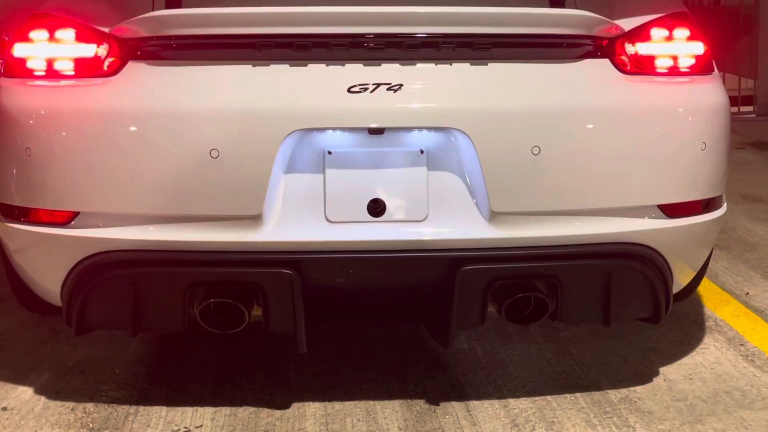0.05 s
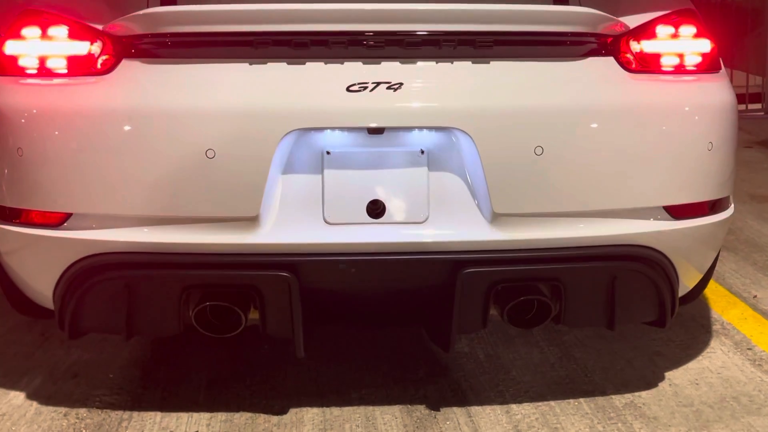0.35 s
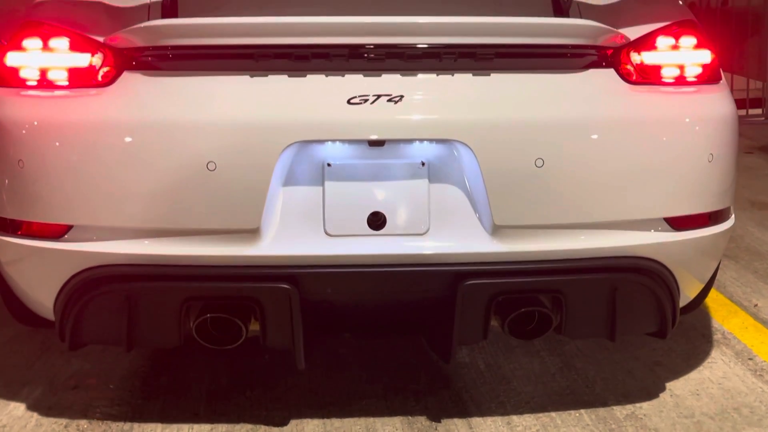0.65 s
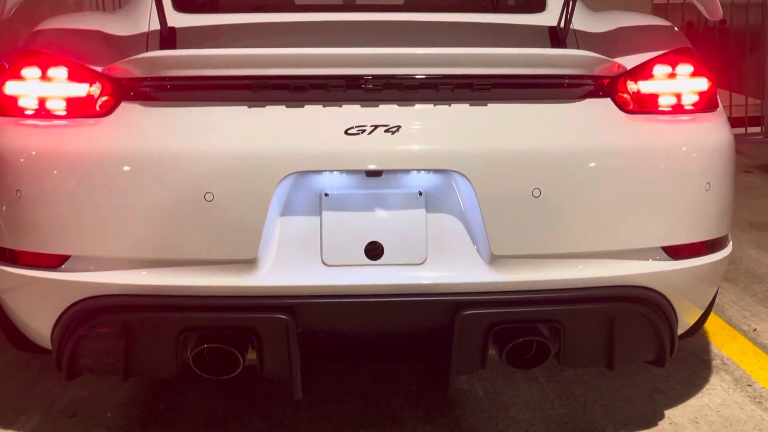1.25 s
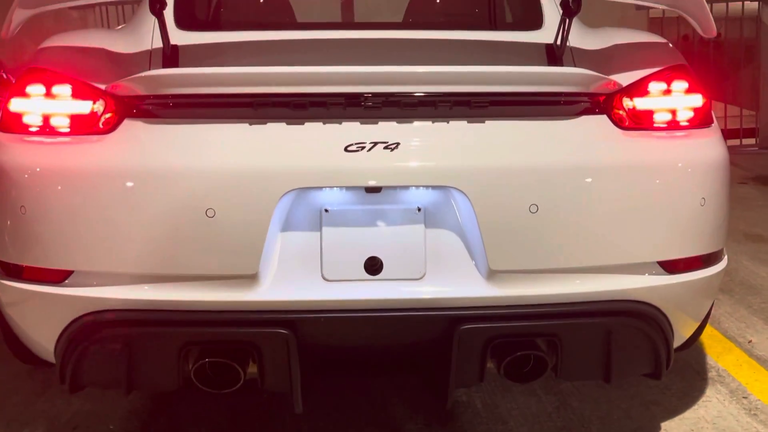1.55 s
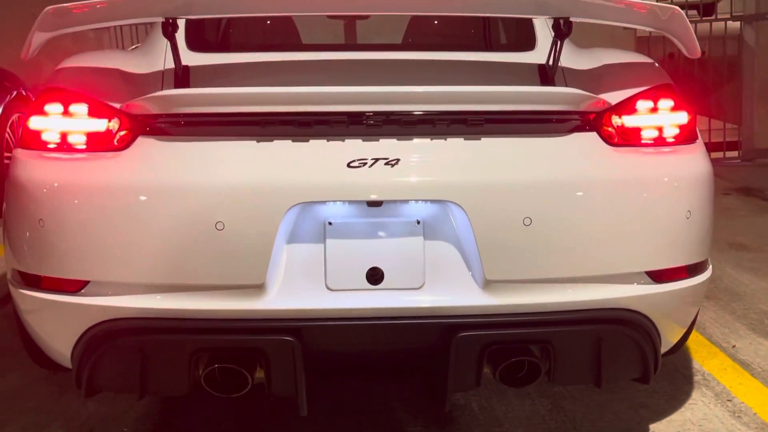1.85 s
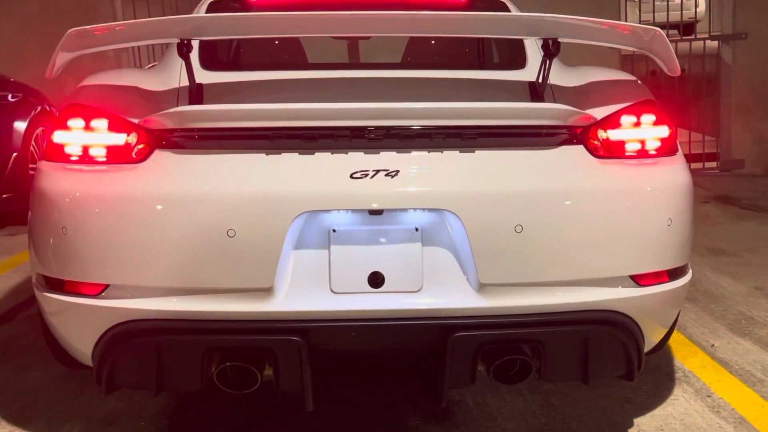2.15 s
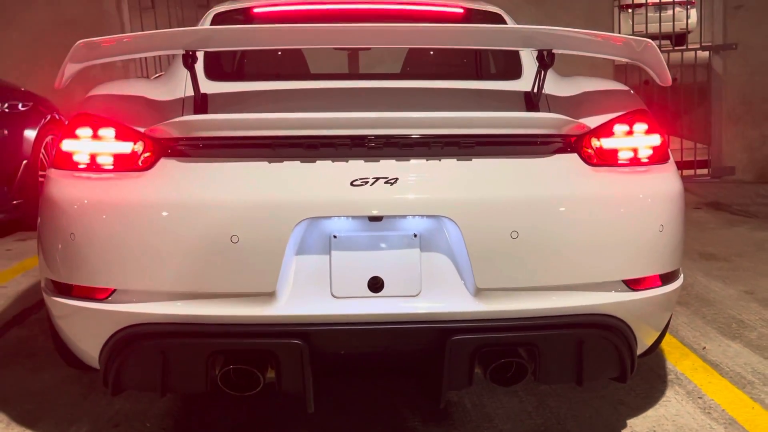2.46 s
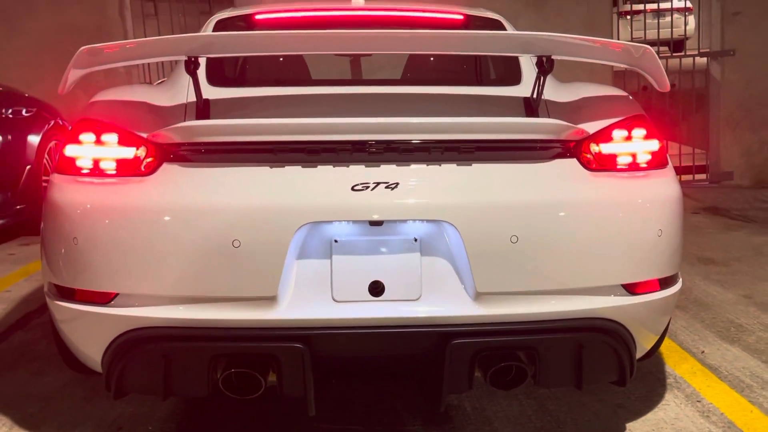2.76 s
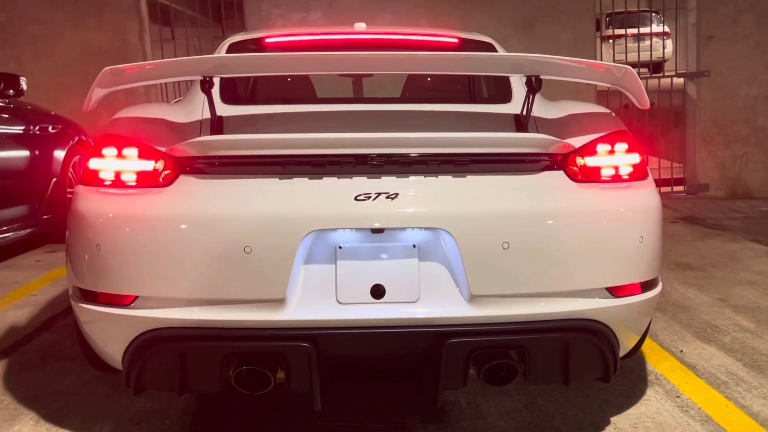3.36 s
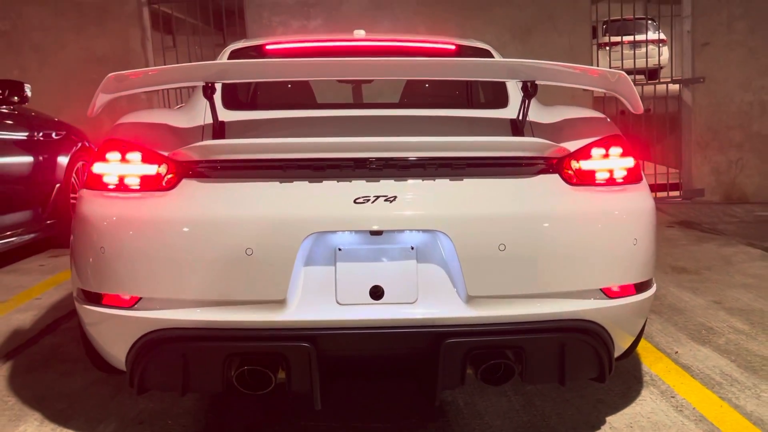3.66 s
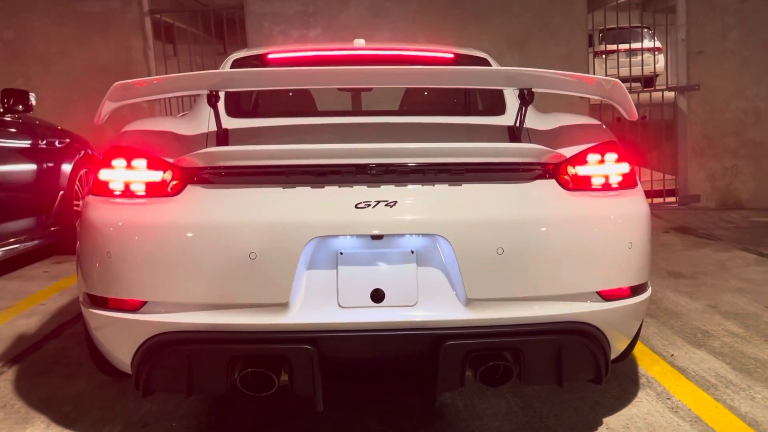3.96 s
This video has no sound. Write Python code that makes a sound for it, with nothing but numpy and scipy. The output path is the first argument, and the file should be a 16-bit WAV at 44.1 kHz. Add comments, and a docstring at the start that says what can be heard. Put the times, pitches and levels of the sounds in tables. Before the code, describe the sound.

Close to the tailpipes, a sports car exhaust burbles as its revs fall and echo through a parking garage. The engine then settles into a deep, throbbing idle with mechanical whirr and light ticks, growing more uneven.

```python
"""A six-cylinder sports car in a concrete parking garage, stereo microphone close behind the tailpipes.
First the revs sink from a blip with a hollow drone and stray burbles, while the garage rings out.
At about half a second the engine catches and settles into a lumpy idle: each firing is a thump and a puff
of hiss, over the whirr and tick of the engine. Near 1.8 s we step back and the exhaust tone shifts;
from there on the lope comes and goes more strongly."""
import sys
import numpy as np
from scipy import signal
from scipy.fft import rfft, irfft
from scipy.io import wavfile

SR = 44100
rng = np.random.default_rng(int(sys.argv[2]) if len(sys.argv) > 2 else 0)


def pcm_store(signal):
    """Save signal as 16-bit PCM."""
    levels = np.round(np.clip(np.atleast_2d(signal), -1, 1) * 32767)
    wavfile.write(sys.argv[1], SR, levels.astype(np.int16).T)


N = 176400
T = np.arange(N) / SR
HZ = np.maximum(np.arange(N // 2 + 1) * SR / N, 1)
CYLINDERS = 6
THUMP_AT = 0.065   # share of a firing period

# Engine speed. Each row: time in seconds, firings per second.
FIRING_RATE = [(0.0, 62.0), (0.15, 52.0), (0.27, 45.0), (0.45, 40.0), (0.68, 38.47), (0.9, 39.84),
               (1.35, 39.31), (2.08, 37.76), (2.27, 36.71), (2.45, 38.08), (2.55, 36.72), (2.68, 37.54),
               (3.25, 38.04), (3.43, 35.87), (3.6, 37.79), (3.72, 36.6), (4.0, 38.36)]
# Mechanical noise, which whirr, valves and injectors follow. Each row: time in seconds, level in dB.
ENGINE_BAY_LEVEL = [(0, -55), (.25, -55.5), (.48, -49), (.6, -47.5), (1.5, -46), (2.3, -45), (3.4, -43.5),
                    (4, -42)]


def from_db(db):
    """Decibels to gain."""
    return 10 ** (np.asarray(db) / 20)


def rms_one(x):
    """Scale to unit power."""
    return x / np.sqrt(np.mean(x ** 2) + 1e-20)


def in_time(rows):
    """A control curve at every sample."""
    return np.interp(T, *np.transpose(rows))


def over_hz(rows):
    """A spectrum table at every frequency."""
    hz, value = np.transpose(rows)
    return np.interp(np.log(HZ), np.log(hz), value)


def bell(hz, width):
    """Power response of one resonance."""
    return 1 / (1 + (2 * (HZ - hz) / width) ** 2)


def drift(rate_hz):
    """Random wander of unit power, mostly slower than the given rate."""
    return rms_one(irfft(rfft(rng.standard_normal(N)) / (1 + (HZ / rate_hz) ** 2), N))


def noise(colour_db):
    """Coloured stereo noise of unit power, widest where the garage dominates."""
    # Diffuse share at the microphone. Each row: frequency in Hz, side minus mid in dB.
    width = [(40, -27), (130, -15.5), (300, -9), (600, -8), (1100, -5), (2200, -11), (4000, -13.5),
             (5500, -37), (8000, -33.5), (12500, -9)]
    mid, side = rfft(rng.standard_normal((2, N))) * from_db(colour_db)
    return rms_one(irfft(mid + side * from_db(over_hz(width)) * [[1], [-1]], N))


def struck(hits, modes, scatter_db):
    """Hits (s, dB) set modes (Hz, dB, t60 s) ringing; each mode's strength scatters from hit to hit."""
    start_s, db = np.transpose(hits)
    starts = (np.maximum(start_s, 0) * SR).astype(int)
    chance = rng.standard_normal((len(starts), len(modes)))
    out = 0
    for (hz, mode_db, t60), luck in zip(modes, chance.T):
        clicks = np.bincount(starts, from_db(db + mode_db + scatter_db * luck), N)[:N]
        r, w = from_db(-60 / (t60 * SR)), 2 * np.pi * hz / SR   # pole radius and angle
        out = out + signal.lfilter([0, np.sin(w)], [1, -2 * r * np.cos(w), r * r], clicks + 1e-18)
    return out


def blows(firings, place, every, db, jitter_s=.0007):
    """Hits (s, dB) of a part that strikes once in so many firings, following the engine bay's level."""
    start_s = np.interp(np.arange(place, firings[-1], every), firings, T)
    start_s = start_s + jitter_s * rng.standard_normal(size=400)[:len(start_s)]
    return np.column_stack([start_s, db + np.interp(start_s, *np.transpose(ENGINE_BAY_LEVEL))])


def pulses(firings, orders, waver_db, waver_hz, lope=0, lope_top_order=3.9):
    """One pressure pulse per firing, summed from orders: multiples of the firing rate."""
    # The third order booms in the garage as we move. Each row: time in seconds, gain in dB.
    boom_db = [(0, -3.5), (.8, 1), (1.45, -2), (1.75, 2), (2.08, 4), (2.25, -4.5), (2.45, 2.5),
               (2.55, -5.5), (2.75, -0.5), (3.05, 1), (3.4, -2.5), (3.75, -3.5), (4, 2)]
    # Hollow pipe note of orders 11 to 13. Each row: time in seconds, gain in dB.
    hollow_db = [(.52, -13), (.65, 1.5), (1.0, -0.5), (1.6, 1), (2.0, 2), (2.3, 2.5), (2.85, -1.5),
                 (3.0, 2), (3.25, 3.5), (3.45, 1), (3.65, -1), (3.86, -2.5), (3.97, 6)]
    boom, hollow = from_db(in_time(boom_db)), from_db(in_time(hollow_db))
    gains = {1: -1, 3: boom, 11: hollow, 12: hollow, 13: hollow}   # the silencer inverts the first order
    out = 0
    for order, db in orders:
        # The garage evens out the lope in the higher orders.
        banks = 1 - lope * np.cos(np.pi * firings) / (1 + (order / lope_top_order) ** 2)
        lead_rad = .11 * order + 1.4 * (order >= 5)   # the pipes turn the upper orders further
        wave = np.cos(2 * np.pi * order * firings + lead_rad)
        out = out + gains.get(order, 1) * banks * from_db(db + waver_db * drift(waver_hz)) * wave
    return rms_one(out)


def coasting(firings, silencer_hz=60.7, width_hz=8.6, boost_db=15.4):
    """Unfired cylinders pump air unevenly while the revs sink through the silencer's resonance."""
    # The drone ahead of the resonance. Each row: time in seconds, level in dB.
    level = [(0, -26), (.055, -26.5), (.11, -34.5), (.22, -28), (.33, -34), (.44, -34), (.52, -41),
             (.7, -66)]
    # Its hollow tone. Each row: order, relative level in dB.
    orders = [(1, -8), (2, 0.5), (3, -7.5), (4, -21), (5, -13.5), (7, -10.5)]
    air = pulses(firings - THUMP_AT + 0.061 * drift(15), orders, waver_db=0, waver_hz=10)
    resonance = from_db(boost_db * bell(silencer_hz, width_hz))
    return from_db(in_time(level)) * irfft(rfft(air) * resonance, N)


def garage_tail(start_db=-36.5, fall_db_per_s=24):
    """Reverberation of the blip fades between the concrete walls."""
    # Colour of the reverberation. Each row: frequency in Hz, relative level in dB.
    tone = [(200, -4), (500, -4.5), (680, -5), (960, 2.5), (1400, -8.5), (2300, -7.5), (4000, -17.5),
            (8000, -24), (13000, -60)]
    return noise(over_hz(tone)) * from_db(start_db - fall_db_per_s * T)


def exhaust(firings, jitter=0.0069, uneven_db=.5, step_back_s=(1.82, 1.85)):
    """Thumps from the two cylinder banks in turn; their tone shifts as we step back."""
    # Strength of the thumps. Each row: time in seconds, level in dB.
    level = [(0, -36.5), (.45, -40), (.49, -28.5), (.6, -25), (.68, -22), (.95, -21), (1.1, -21.5),
             (1.45, -20.5), (1.75, -19.5), (2.1, -22), (2.55, -19.5), (3.0, -18.5), (3.45, -18.5),
             (3.75, -18), (4, -18)]
    # One bank beats harder than the other. Each row: time in seconds, depth as a share.
    lope = [(0, 0.061), (1.5, 0.078), (2.3, 0.22), (2.85, 0.48), (3.1, .1), (3.45, .2), (4, 0.61)]
    # Tone close to the pipes, then further back. Each row: order, relative level in dB.
    near_orders = [(1, -4.5), (2, -7), (3, 0.5), (4, -7.5), (5, -11.5), (6, -22), (7, -17), (8, -19),
                   (9, -25), (10, -63), (11, -15.5), (12, -16.5), (13, -38), (14, -30), (15, -42)]
    far_orders = [(1, -4), (2, -4), (3, 2.5), (4, -6), (5, -15.5), (6, -11.5), (7, -12.5), (8, -41),
                  (9, -12.5), (10, -62), (11, -13.5), (12, -14.5), (13, -28.5), (14, -31), (15, -29),
                  (16, -62), (17, -40)]
    thumps = firings - THUMP_AT + jitter * drift(14)
    near = pulses(thumps, near_orders, waver_db=1.07, waver_hz=4.6, lope=in_time(lope))
    far = pulses(thumps, far_orders, waver_db=1.07, waver_hz=4.6, lope=in_time(lope))
    back = np.interp(T, step_back_s, [0, 1])
    return ((1 - back) * near + back * far) * from_db(in_time(level) + uneven_db * drift(5.4))


def rumble(firings, swell_db=1.5):
    """Low turbulence of the gas swells with each thump, smeared by the garage."""
    # Strength of the turbulence. Each row: time in seconds, level in dB.
    level = [(0, -34), (.3, -30.5), (.46, -34), (.65, -31), (1.5, -32), (2.5, -29.5), (3.25, -30),
             (3.4, -26.5), (4, -26.7)]
    # Its colour. Each row: frequency in Hz, relative level in dB.
    tone = [(22, -25), (45, -3), (80, -4.5), (135, 2), (200, -7), (300, -9), (378, -16), (455, -7.5),
            (530, -19), (620, -35), (1200, -68)]
    swell = rms_one(from_db(swell_db * np.cos(2 * np.pi * (firings - THUMP_AT))))
    return noise(over_hz(tone)) * swell * from_db(in_time(level))


def whirr(firings, level_db=0.5, throb_db=0.94, throb_at=0.87, flutter_db=0.74):
    """Valve gear and belts rattle in the resonances of the engine bay."""
    # Broad colour of the rattle. Each row: frequency in Hz, relative level in dB.
    tone = [(300, -10), (600, 1.5), (750, -0.5), (1050, -3.5), (1450, -5.5), (2000, -7.5), (2600, -3.5),
            (3200, 0), (3900, -11), (5500, -15.5), (13000, -44)]
    # Resonances of the bay. Each row: centre in Hz, width in Hz, boost in dB.
    peaks = [(636.5, 8.5, 6.5), (903, 103, 7), (1210, 76, 7), (1640, 40, 8), (1880, 42, 9.5),
             (2230, 61, 5.5), (2995, 130, 6.5)]
    colour = over_hz(tone) + sum(db * bell(hz, width) for hz, width, db in peaks)
    throb = throb_db * np.cos(2 * np.pi * (firings - throb_at)) + flutter_db * drift(40)
    return noise(colour) * from_db(in_time(ENGINE_BAY_LEVEL) + level_db + throb)


def puffing(firings, tone, scatter_db, grain_db, puff_at=0.56, rise_s=0.0056, decay_s=0.0065):
    """Gas hisses from the pipes; once the engine catches, a sharp, grainy puff leads each thump."""
    # Hiss at the tailpipes. Each row: time in seconds, level in dB.
    level = [(0, -49), (.2, -56), (.55, -56), (.7, -53.5), (1.3, -53), (2.2, -51.5), (2.7, -49.5),
             (3.5, -49.5), (4, -46)]
    count, share = np.divmod(firings - puff_at + 1, 1)
    age_s = share / in_time(FIRING_RATE)
    luck = rng.standard_normal(size=400)[count.astype(int)]
    strength = from_db(15.5 + scatter_db * luck + grain_db * drift(400))
    caught = np.interp(T, (.5, .75), [0, 1])
    puffs = strength * (1 - np.exp(-age_s / rise_s)) * np.exp(-age_s / decay_s) * caught
    envelope = rms_one(np.hypot(1, puffs))   # steady hiss and puffs add in power
    return noise(over_hz(tone)) * envelope * from_db(in_time(level))


def hiss(firings, sizzle_db=-2.5):
    """Escaping gas makes broad puffs with a fine, more uneven sizzle on top."""
    # Colours of the puffs and the sizzle. Each row: frequency in Hz, relative level in dB.
    broad_tone = [(800, -11), (1800, -2), (2300, 0.5), (2800, 1), (4100, -10), (4600, -3), (7000, 1.5),
                  (8000, -2.5), (9200, 2), (10000, 1.5), (11400, -10), (15000, -45)]
    sizzle_tone = [(8500, -40), (10000, -3), (10600, 1), (11400, -5.5), (12300, -17), (13000, -20),
                   (15000, -50)]
    sizzle = puffing(firings, sizzle_tone, scatter_db=4.0, grain_db=2.5)
    broad = puffing(firings, broad_tone, scatter_db=2.0, grain_db=0.8)
    return broad + from_db(sizzle_db) * sizzle


def injector_clatter(firings):
    """An injector clacks ahead of every firing, now and then much harder."""
    # The hardest clacks. Each row: start in seconds, strength in dB.
    hard_clacks = [(1.302, -45), (1.635, -44), (2.106, -39.5), (2.401, -45), (2.429, -41), (2.508, -39),
                   (2.669, -42), (2.724, -38), (3.359, -39), (3.415, -44)]
    # Ring of the injectors. Each row: frequency in Hz, gain in dB, seconds to fall 60 dB.
    modes = [(1880, -12, .03), (2180, -6, .025), (2305, -0.5, .036), (2410, -8, .025)]
    steady_clacks = blows(firings, place=.6, every=1, db=-2.5)
    return struck(np.vstack([hard_clacks, steady_clacks]), modes, scatter_db=1.8)


def burble():
    """Stray firings thump in the silencer while the revs sink."""
    # The stray firings. Each row: start in seconds, strength in dB.
    strays = [(.047, -20), (.075, -16.5), (.170, -19), (.219, -14), (.284, -16.5), (.308, -20), (.348, -20),
              (.476, -20.5), (.502, -26)]
    # Ring of the silencer. Each row: frequency in Hz, gain in dB, seconds to fall 60 dB.
    modes = [(72, -8, 0.071), (108.6, 0, 0.073), (173, -10.5, 0.054), (313, -10.5, 0.047)]
    return -struck(strays, modes, scatter_db=0)


def valve_ticks(firings, level_db=6, fade_in_s=(.3, .52)):
    """As the engine catches, valves start to tick in a metallic pattern that repeats each cycle."""
    # Ticks of one engine cycle. Each row: place counted in firings, relative strength in dB.
    pattern = [(.12, -6), (.7, -9), (1.73, -4.5), (2.05, 0), (2.78, -4.5), (3.25, -8), (3.8, -5.5),
               (4.35, -8.5), (4.75, -6), (5.6, -9)]
    # Ring of the valves. Each row: frequency in Hz, gain in dB, seconds to fall 60 dB.
    modes = [(2740, -12, .015), (2864, -3, 0.03), (3063, -0.5, 0.049), (3220, -13, 0.018),
             (3610, -17, 0.023)]
    hits = np.vstack([blows(firings, place, every=CYLINDERS, db=level_db + db) for place, db in pattern])
    return struck(hits, modes, scatter_db=1.4) * np.interp(T, fade_in_s, [0, 1])


def scene():
    """Tailpipes, garage and engine bay; one running count of firings keeps the engine's parts in step."""
    firings = np.cumsum(in_time(FIRING_RATE)) / SR
    pipes = exhaust(firings) + coasting(firings) + burble() + rumble(firings) + hiss(firings)
    return pipes + garage_tail() + whirr(firings) + valve_ticks(firings) + injector_clatter(firings)


def record(dry, low_cut_hz=35.5, high_cut_hz=12900, fade_s=.004):
    """Two microphone ports differ in level and phase; the deep bass and the top are cut."""
    # Balance of the ports. Each row: frequency in Hz, left minus right in dB.
    balance = [(60, -0.4), (130, -1.47), (270, -1.5), (590, 0.6), (1260, 2), (2690, 0.013), (5760, 0),
               (12300, 0.0)]
    # Phase between the ports. Each row: frequency in Hz, left minus right in radians.
    phase = [(150, 0), (600, .4), (1250, .4), (1600, -.5), (1900, -.1), (2700, .2), (3050, .7), (4100, .35),
             (5100, 0), (8850, 0), (9400, -1.8), (10200, -3.14), (10900, -4.3), (11750, -6.28)]
    sides = np.array([[1], [-1]]) / 2
    ports = from_db(sides * over_hz(balance)) * np.exp(1j * sides * over_hz(phase))
    low_cut = 1 / np.sqrt(1 + (low_cut_hz / HZ) ** 12)
    high_cut = signal.ellip(10, .1, 80, high_cut_hz, fs=SR, output="sos")
    fade = np.clip(np.minimum(T, T[::-1]) / fade_s, 0, 1)
    heard = irfft(rfft(dry * fade) * ports * low_cut, N)
    return signal.sosfilt(high_cut, heard)


dry = scene()
out = record(dry)
pcm_store(out)
```